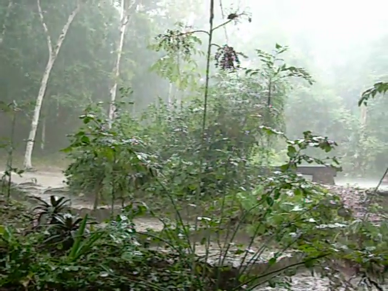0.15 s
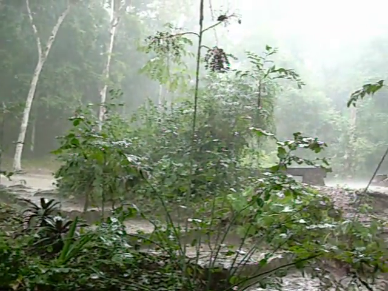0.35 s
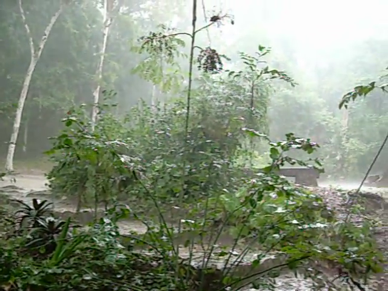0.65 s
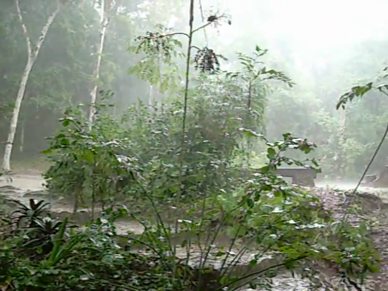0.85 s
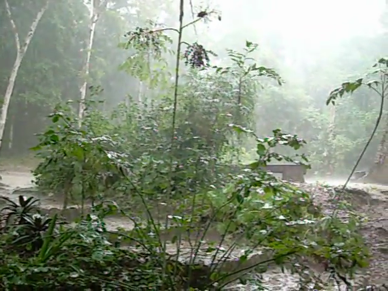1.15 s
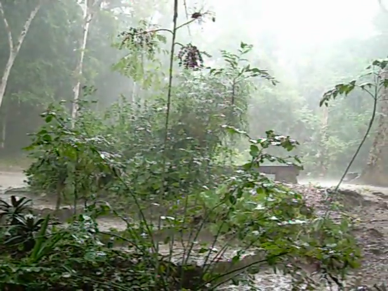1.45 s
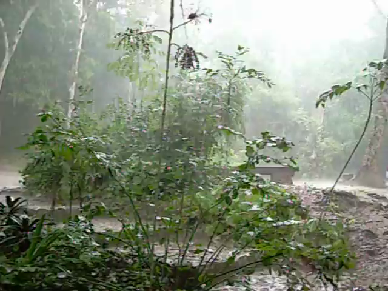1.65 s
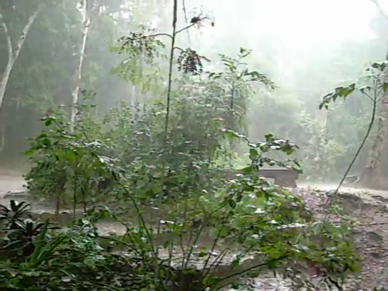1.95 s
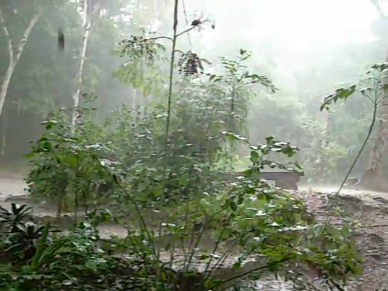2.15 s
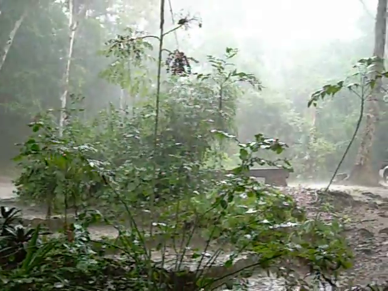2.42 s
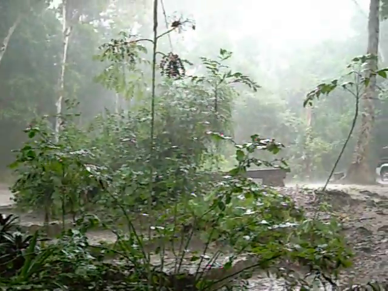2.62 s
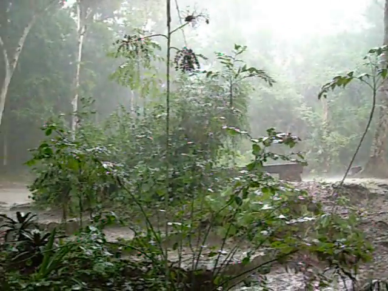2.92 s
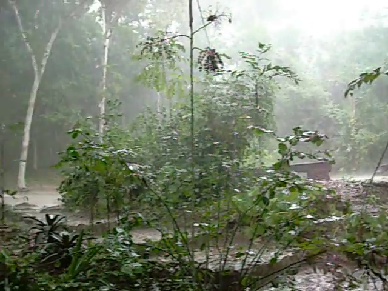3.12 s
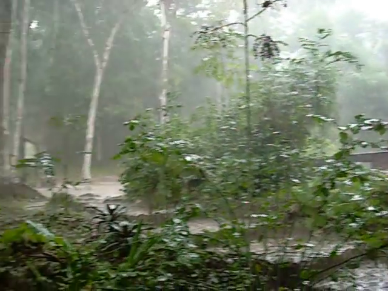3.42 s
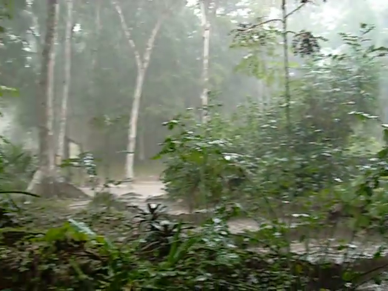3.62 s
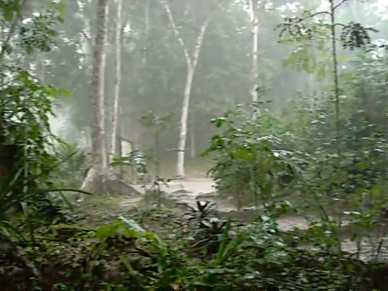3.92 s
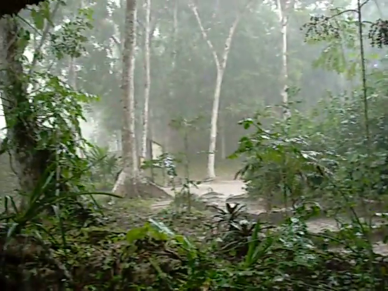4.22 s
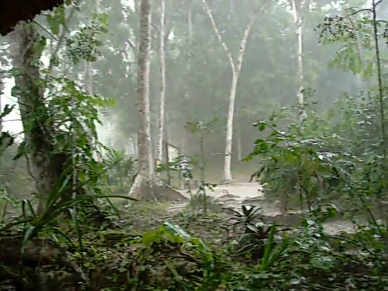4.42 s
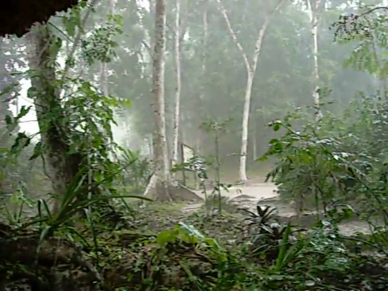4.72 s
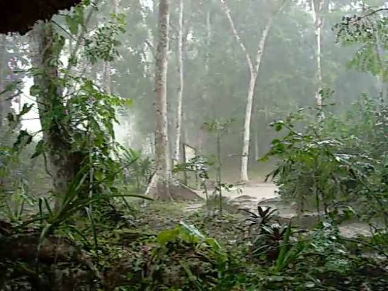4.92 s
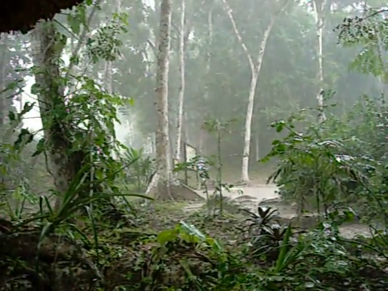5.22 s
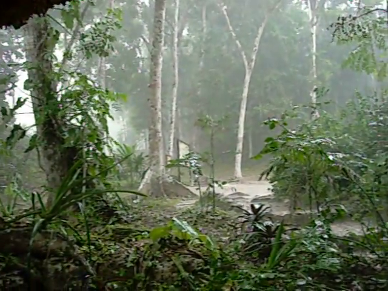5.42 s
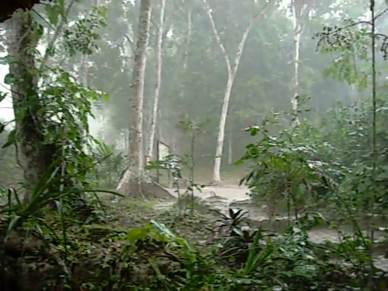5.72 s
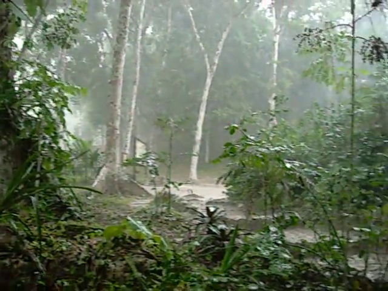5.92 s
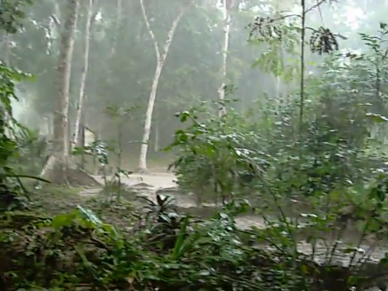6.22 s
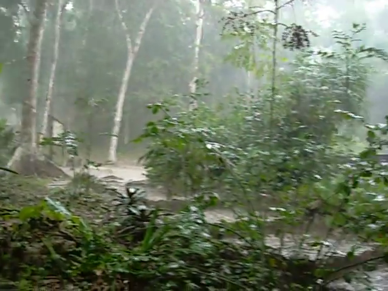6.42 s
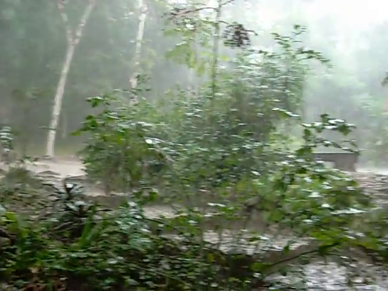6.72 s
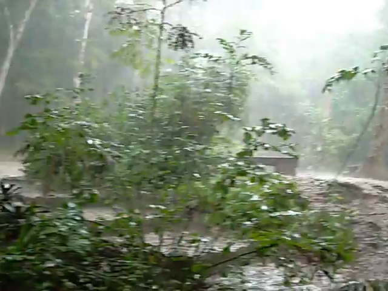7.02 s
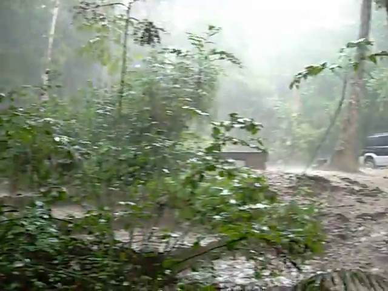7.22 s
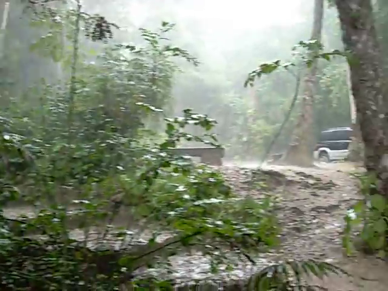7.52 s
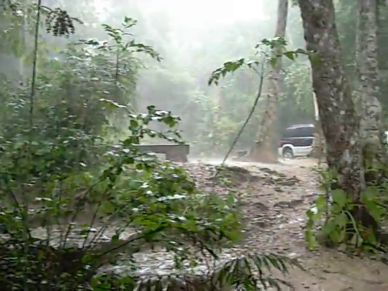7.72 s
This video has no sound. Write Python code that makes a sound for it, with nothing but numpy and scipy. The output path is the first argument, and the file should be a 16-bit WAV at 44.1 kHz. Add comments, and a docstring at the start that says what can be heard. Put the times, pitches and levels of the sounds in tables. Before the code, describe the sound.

Hard tropical rain pours steadily onto jungle leaves and wet ground, a dense narrow-band hiss with crackling patter and a few sharp close drips.

```python
"""A downpour drums on jungle trees, shrubs and wet ground, as a pocket camera picks it up.
Filtered noise is the wash of countless far drops; short damped tones are the nearer ones:
patter on leaves, rising plips in puddles and fat drips that smack close by.
Light wind rumbles on the microphone; the narrow-band recorder limits and clips the hardest drips."""
import sys
import numpy as np
from scipy import signal
from scipy.fft import rfft, irfft, next_fast_len
from scipy.io import wavfile
from scipy.ndimage import uniform_filter1d, minimum_filter1d

SR = 44100
rng = np.random.default_rng(int(sys.argv[2]) if len(sys.argv) > 2 else 0)


def file_out(sig):
    """Save sig as 16-bit WAV at sys.argv[1]."""
    # one column per channel
    cols = np.atleast_2d(sig).T
    # limit, then scale
    lim = np.clip(cols, -1, 1)
    pcm = np.round(lim * 32767).astype(np.int16)
    wavfile.write(sys.argv[1], SR, pcm)


N = 346626
TIME = np.arange(N) / SR  # seconds


def undb(db):
    """Logarithmic level: decibels become an amplitude gain."""
    return 10 ** (np.asarray(db) / 20)


def unit(x):
    """Normalisation: scale a signal to an rms of 1."""
    return x / np.sqrt(np.mean(x ** 2))


def colour(x, points):
    """Spectral shaping: zero-phase filter through (Hz, dB) points joined on a log-frequency axis."""
    hz, db = np.transpose(points)
    size = next_fast_len(N + SR)
    bins = np.maximum(np.fft.rfftfreq(size, 1 / SR), 1)
    gain = undb(np.interp(np.log(bins), np.log(hz), db))
    return irfft(rfft(x, size) * gain, size)[:N]


def walk(rate):
    """Slow random fluctuation: `rate` chance levels per second, joined smoothly, with an rms of 1."""
    step = int(SR / rate)
    levels = rng.standard_normal(N // step + 2)
    return unit(uniform_filter1d(np.repeat(levels, step), step)[:N])


def add(out, s, sound):
    """Superposition: mix a short sound in at time s, in seconds."""
    start = int(np.clip(s * SR, 0, N - 1))
    out[start:start + len(sound)] += sound[:N - start]


def ring(hz, cycles, glide=0):
    """Damped resonance: the envelope swells to 1 after `cycles` turns, then decays; pitch may rise."""
    turns = np.arange(int(10 * cycles * SR / hz)) * hz / SR
    age = turns / cycles
    envelope = age * np.exp(1 - age)
    return envelope * np.sin(2 * np.pi * turns * (1 + glide * age / 20))


def drops(rate, low_hz, high_hz, cycles, spread_db, glide=0):
    """Random impacts: `rate` drops per second, each with its own moment, pitch, damping and size."""
    out = np.zeros(N)
    for when, pitch, damping, size, side in rng.random((int(rate * N / SR), 5)):
        # small drops are common, big ones rare; either polarity
        gain = undb(-spread_db * np.log(size + 1 / 20 ** 2)) * np.sign(side - .5)
        hz = low_hz + pitch * (high_hz - low_hz)
        add(out, when * N / SR, gain * ring(hz, cycles * 2 ** (2 * damping - 1), glide))
    return unit(out)


# Spectrum of the wind rumble. Each row: frequency in Hz, relative density in dB.
RUMBLE_SPECTRUM = [(4, -20.5), (14, 0), (25, -5), (60, -19), (130, -34), (500, -79.5)]
# Gusts on the microphone. Each row: time of the height in seconds, level there in dB before
# turbulence, length in seconds (between the points where the gust is down to 1/e).
WIND_GUSTS = [(0.86, -52, .15), (2.25, -44.5, 0.98), (3.05, -50.5, .45), (4.15, -51.5, .3), (7.35, -47, .8)]
# Single buffets of air. Each row: start in seconds, peak in dB before buffet_db, frequency in Hz.
AIR_BUFFETS = [(1.879, -36, 37.7), (2.019, -34.5, 78.1), (2.299, -32, 45), (2.64, -32, 42),
               (4.089, -35, 37.4), (7.249, -33.5, 92), (7.308, -35, 48.4), (7.639, -39, 37.2)]
CALM_DB = -59.5  # rumble between gusts


def wind(buffet_db=4, cycles=0.25, turbulence_db=2):
    """Turbulent pressure: low noise swells unevenly in gusts, with a few soft, heavily damped thumps."""
    rumble = unit(colour(rng.standard_normal(N), RUMBLE_SPECTRUM))
    force = undb(CALM_DB)
    for s, db, length in WIND_GUSTS:
        force = force + undb(db) * np.exp(-(2 * (TIME - s) / length) ** 2)
    out = rumble * force * undb(turbulence_db * walk(6))
    for s, db, hz in AIR_BUFFETS:
        add(out, s, undb(db + buffet_db) * ring(hz, cycles))
    return out


# Rain on the distant canopy and ground. Each row: frequency in Hz, relative density in dB.
WASH_SPECTRUM = [(60, -31.5), (110, -26), (170, -22), (250, -18), (470, -12.5), (800, -8), (1150, -6.5),
                 (1600, -5), (2100, -2.5), (2700, -2.5), (3400, 0.5), (3800, 0.0), (4200, 1.5), (5000, -39)]


def far_rain(ground_db, leaves_db, roar_db=-0.47, hiss_db=-1.0, flutter_db=0.08):
    """Incoherent sum: far drops merge into noise, a low ground roar and a high leaf hiss, each fluttering."""
    wash = colour(rng.standard_normal(N), list(WASH_SPECTRUM) + [(6000, -90.5)])
    low_pass = signal.butter(2, 1700, fs=SR, output="sos")
    roar = signal.sosfiltfilt(low_pass, wash)
    hiss = wash - roar
    low = unit(roar) * undb(ground_db + roar_db + flutter_db * walk(14))
    high = unit(hiss) * undb(leaves_db + hiss_db + flutter_db * walk(12))
    return low + high


def puddles(leaves_db):
    """Bubble resonance: drops trap small bubbles that ring briefly and rise in pitch."""
    plips = drops(rate=230, low_hz=1477, high_hz=3926, cycles=5.5, spread_db=0.5, glide=.08)
    return plips * undb(leaves_db - 16)


def patter(leaves_db):
    """Heavy damping: drops tick and tap on shrubs, whose wet leaves still each within a few cycles."""
    ticks = drops(rate=1900, low_hz=2165, high_hz=4230, cycles=0.84, spread_db=2.5)
    taps = drops(rate=750, low_hz=701, high_hz=2310, cycles=.8, spread_db=1.5)
    return (undb(-5.5) * ticks + undb(-15.5) * taps) * undb(leaves_db)


# The fattest drips on the nearest leaves. Each row: start in seconds, envelope peak in dB
# before the recorder.
FAT_DRIPS = [(0.903, -2.5), (1.0408, 2.5), (1.4802, 0.5), (1.5179, 2.5), (1.947, 4), (2.1599, 1.5),
             (3.4806, -1.5), (4.7155, 2.5), (6.1175, -2.5), (6.5288, -0.5), (6.7436, 4.5)]
DRIPS_PER_S, DRIP_DB = 3, -6.5  # lesser drips at random moments: rate, envelope peak
LEAF_HZ, LEAF_OCTAVES = 2890, 0.26  # pitch of a struck leaf, scale of its scatter


def near_drips(cycles=1.05):
    """Impulsive excitation: branch drips smack leaves by the microphone, a few fat among many lesser."""
    moments = rng.random(int(DRIPS_PER_S * N / SR)) * N / SR
    lesser = [(s, DRIP_DB) for s in moments]
    out = np.zeros(N)
    for s, db in list(FAT_DRIPS) + lesser:
        # leaves scatter a little further down than up
        hz = LEAF_HZ * 2 ** (LEAF_OCTAVES * rng.uniform(-1.2, 1))
        add(out, s, undb(db) * ring(hz, cycles))
    return out


GROUND_DB, LEAVES_DB = -26, -17.5  # steady rain on far ground and canopy, and on leaves
SWELL_DB, SWELLS_PER_S = 0.04, 1.0  # rms of the slight swell, its chance levels per second


def scene():
    """Common modulation: far rain, patter and puddles swell as one; drips and wind go their own way."""
    swell_db = SWELL_DB * walk(SWELLS_PER_S)
    ground_db = GROUND_DB + swell_db
    leaves_db = LEAVES_DB + swell_db
    background = wind() + far_rain(ground_db, leaves_db)
    near = puddles(leaves_db) + patter(leaves_db) + near_drips()
    return (background + near)[None]


CEILING = .72  # amplitude where limiting starts and clipping cuts


def limit(x, ratio=3.8, hold_s=.002):
    """Peak compression: a fast limiter takes most of each overshoot; what gets past it is clipped."""
    size = int(hold_s * SR)
    gain = (CEILING / np.maximum(abs(x), CEILING)) ** (1 - 1 / ratio)
    smooth_gain = uniform_filter1d(minimum_filter1d(gain, size), size)
    return np.clip(x * smooth_gain, -CEILING, CEILING)


# The recorder's filter before sampling. Each row: frequency in Hz, gain in dB.
BEFORE_SAMPLING = [(3700, 0), (3900, -1.5), (4000, -5), (4100, -25), (4400, -90)]
# The recorder's filter after sampling. Each row: frequency in Hz, gain in dB.
AFTER_SAMPLING = [(3700, 0), (3850, -1.3), (4000, -6), (4200, -12.5), (4400, -27), (4550, -44), (4800, -90)]
SAMPLING_HZ, TOP_HZ = 8000, 15800  # slow sampling rate, final low-pass edge


def record(dry):
    """Band-limited sampling: only the voice band passes; peaks clipped at the ceiling spit some treble."""
    narrow = colour(dry[0], BEFORE_SAMPLING)
    # slow sampling mirrors the top of the band around half the sampling rate
    sampled = narrow * (1 + 2 * np.cos(2 * np.pi * SAMPLING_HZ * TIME))
    limited = limit(colour(sampled, AFTER_SAMPLING))
    low_pass = signal.ellip(8, .1, 70, TOP_HZ, fs=SR, output="sos")
    return signal.sosfilt(low_pass, limited)[None]


dry = scene()
out = record(dry)
file_out(out)
```